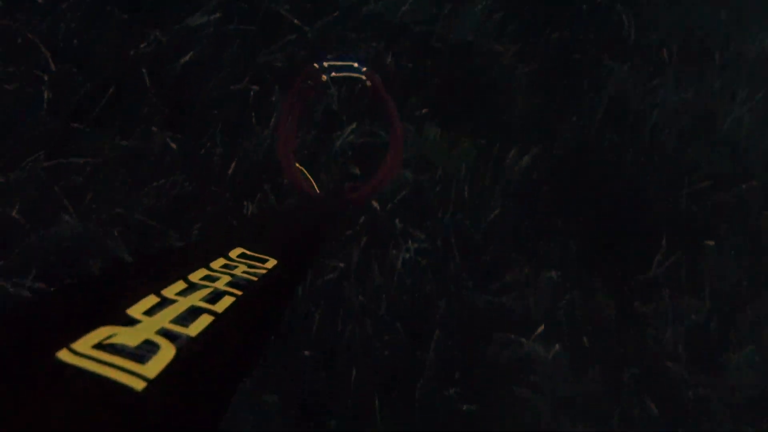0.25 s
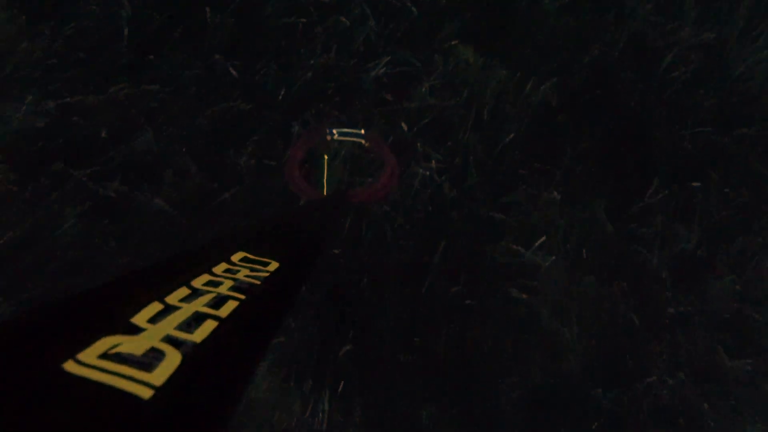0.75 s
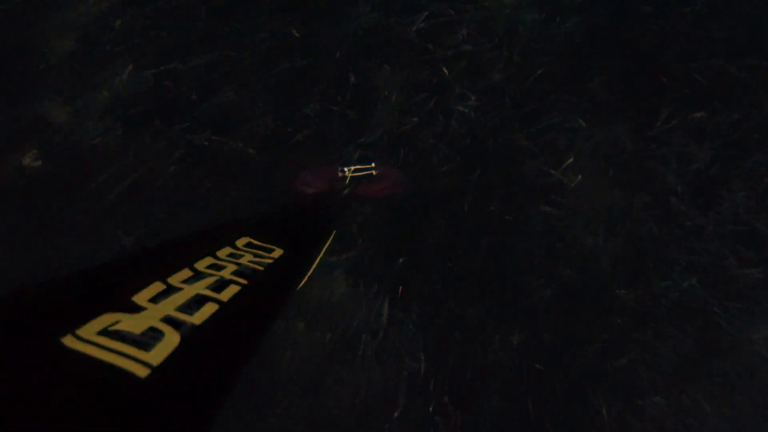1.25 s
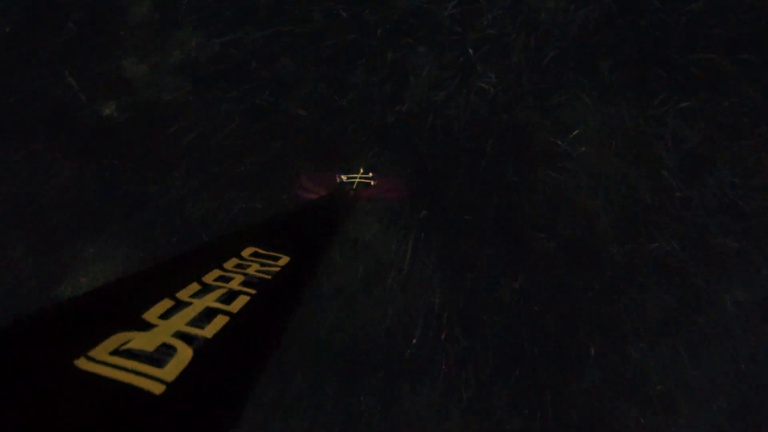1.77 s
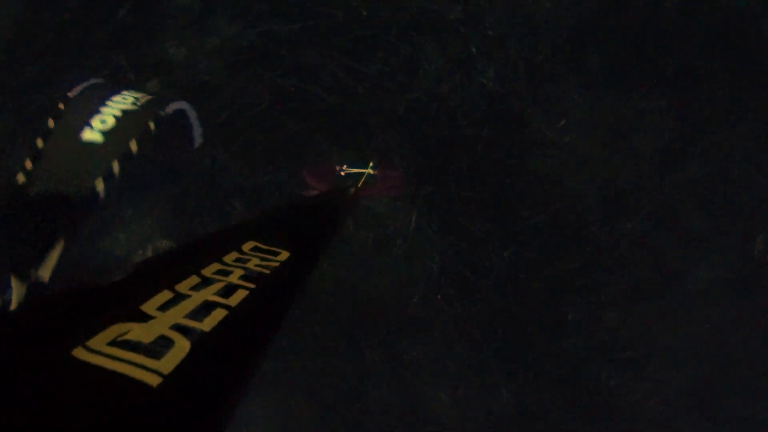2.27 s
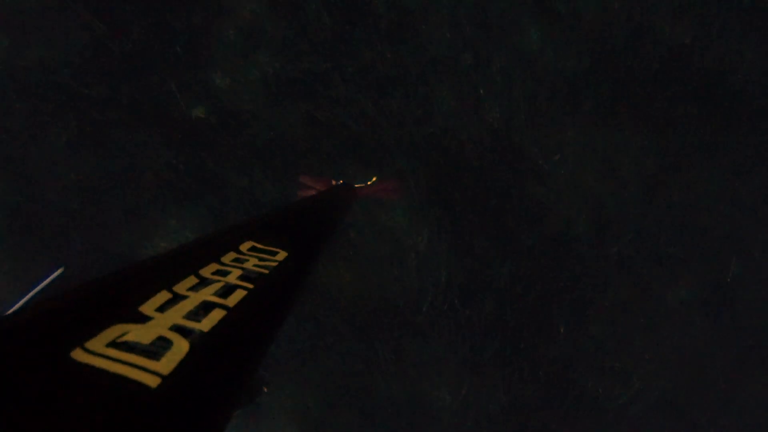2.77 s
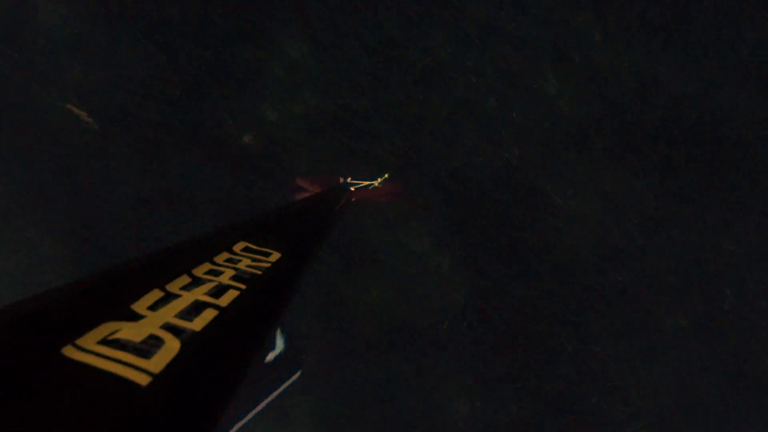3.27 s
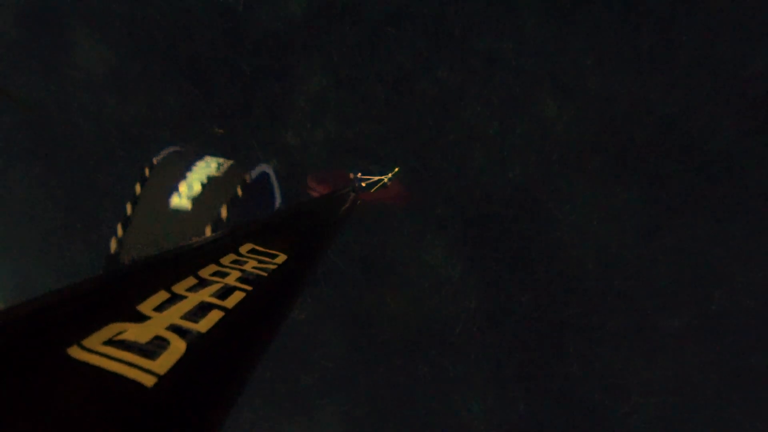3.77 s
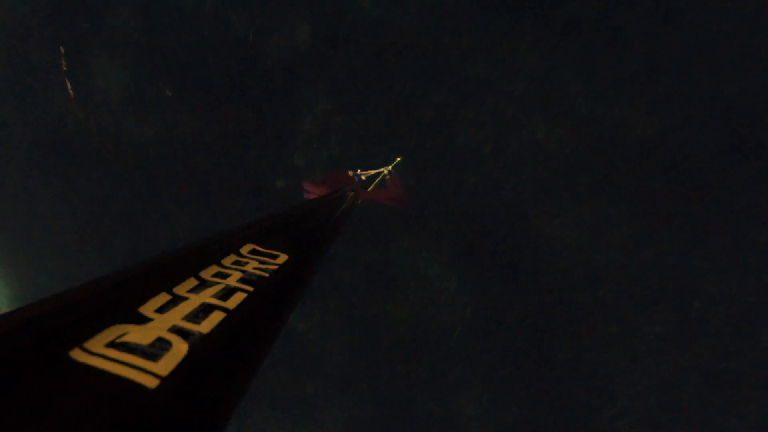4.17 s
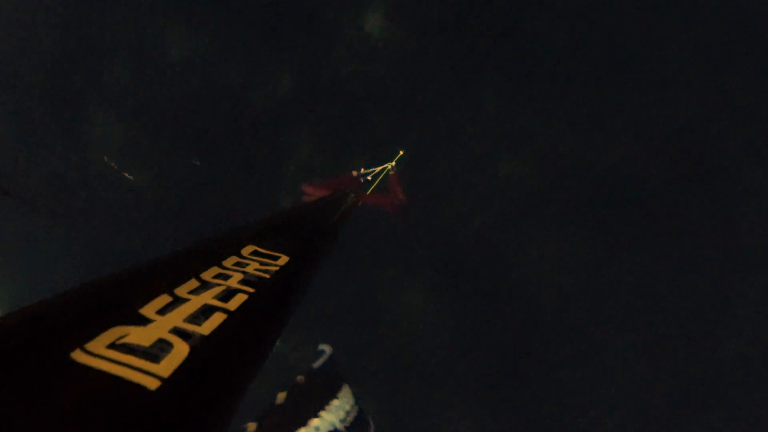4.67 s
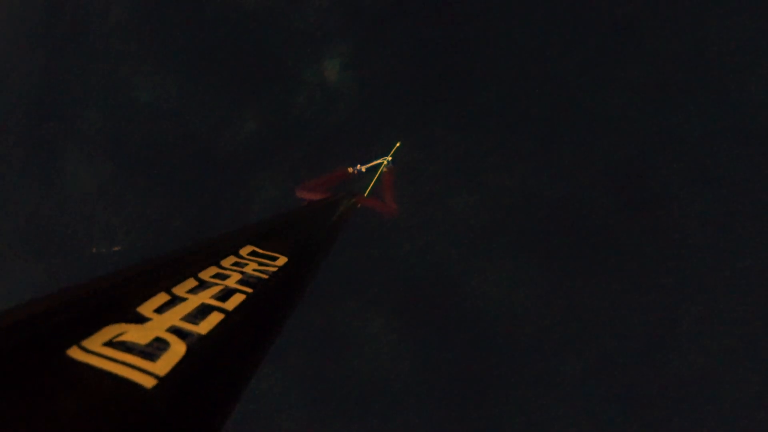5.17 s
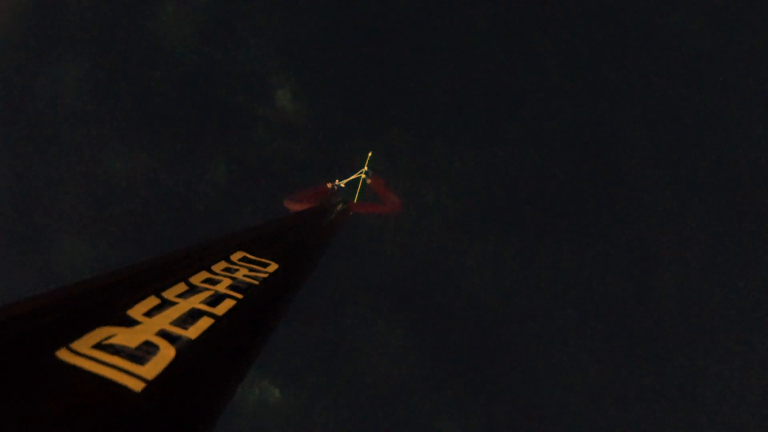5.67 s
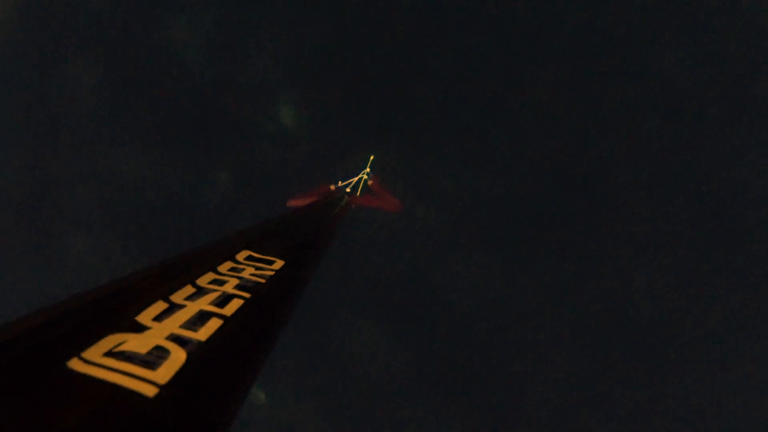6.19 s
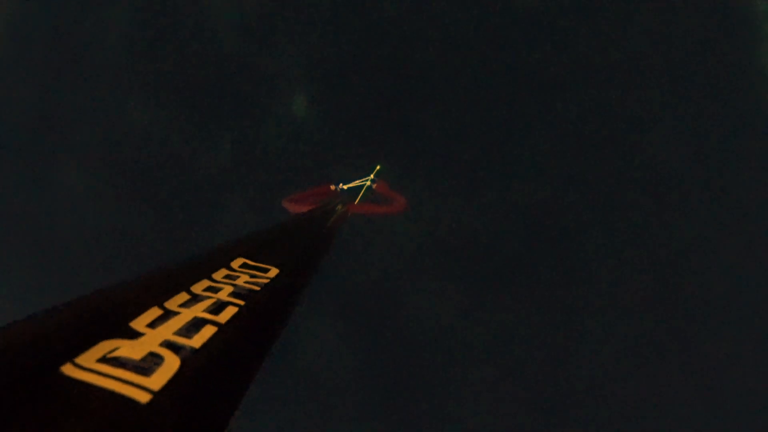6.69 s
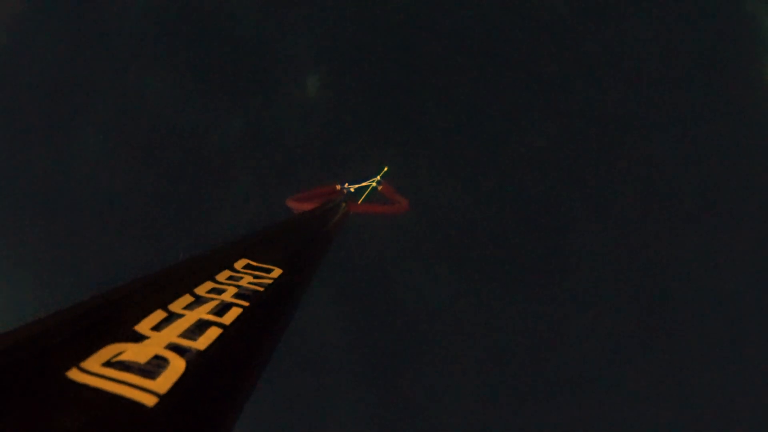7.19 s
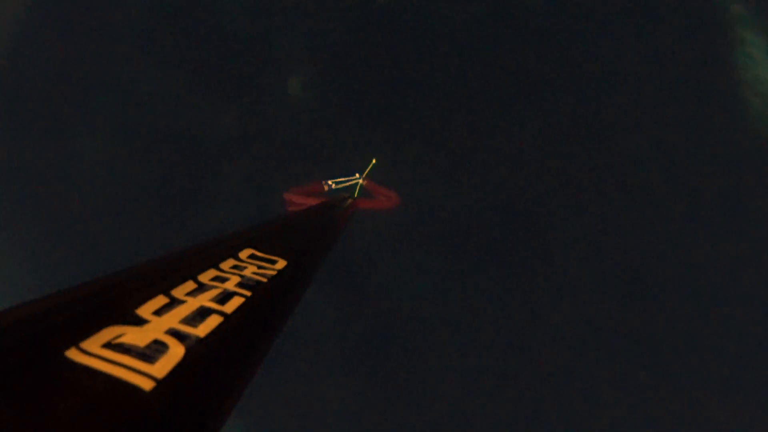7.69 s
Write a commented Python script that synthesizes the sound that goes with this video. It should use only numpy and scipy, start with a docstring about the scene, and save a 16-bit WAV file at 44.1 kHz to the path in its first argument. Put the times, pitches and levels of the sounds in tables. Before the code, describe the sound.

Close underwater sound picked up through a pole and a sealed camera case. Weed stems tick and crackle lightly over faint hiss, with short hollow ringing taps and a bubble plip. Around the middle the knocks grow heavier and more frequent and a low hum rises. Then shoves against the bottom bring bumps, gritty scrapes, short groans and squeaky brushes, busiest near the end.

```python
"""Camera on a pole pushed through weed under water

A camera in a sealed case rides on a pole that is pushed through weed and over the bottom.
Its stereo microphones hear stems and grit up close, as struck and rubbed resonances of pole, mount and case.
Banks of fading sines make the rings and bubble plips; repeated pushes make slips; wavering sines make the hum.
Later shoves bring bumps, groans and a swelling hum, over filtered noise for buffeting and hiss.
"""
import sys
import numpy as np
from scipy import signal
from scipy.fft import rfft, irfft
from scipy.io import wavfile
from scipy.ndimage import uniform_filter1d, map_coordinates

SR = 44100
rng = np.random.default_rng(int(sys.argv[2]) if len(sys.argv) > 2 else 0)


def dump(signal):
    """Clip the signal to [-1, 1] and save it as 16-bit WAV at the path in sys.argv[1]."""
    limited = np.clip(np.atleast_2d(signal).T, -1, 1)
    pcm = np.round(limited * 32767).astype(np.int16)
    wavfile.write(sys.argv[1], SR, pcm)


N = 350154
TIME = np.arange(N) / SR

# All mode tables list nominal resonances, before each blow's scatter and detuning:
# pitch_hz, width_hz, level_db (relative), left_minus_right_db, right_lead_rad
# ringing of the pole
POLE_MODES = [(99, 14, -6, -6, 0.27), (134.9, 14, 4, -6, 0.97), (180, 200, -8, -5.5, 0.97)]
# ringing of the mount between pole and case, same columns
MOUNT_MODES = [(361, 250, -8, 3.5, 0.1), (437.9, 24.5, 5.5, 1.1, 0.5), (534.4, 33, -3.5, -4, -0.5)]
# upper ringing of the mount, same columns
PING_MODES = [(676.7, 100, -2.5, 7, -1.3), (750.6, 33, 0.3, -7.5, -0.72)]
# ringing of the thin case, same columns
CASE_MODES = [(935, 110, 1, 13, -0.65), (1094, 290, 2.5, -6, 1.74), (1245, 116, 5.5, -5.5, 0.44),
              (1876, 93, -8, 1, -1.9), (2207, 230, -16.5, -2.5, -2.5)]
# sharp snaps near the case, same columns
SNAP_MODES = [(1940, 610, 1.5, 0, -2), (3150, 600, -5.5, -1, 1), (6200, 1600, -11, -1, 0)]
# how hard the pole is pushed along: time_s, effort_db
EFFORT = [(0, -56.5), (.7, -49.5), (3.1, -53), (3.9, -40.5), (4.1, -36.5), (5.35, -35), (5.6, -41.5),
          (6, -43), (7.2, -47), (7.94, -44)]
# how thickly the weed brushes the pole: time_s, level_db
WEED = [(0, -47), (.25, -56), (.45, -46), (1.1, -54.5), (1.3, -60), (3, -66), (4.5, -55.5), (5.3, -52),
        (6, -59), (6.48, -43.5), (6.6, -53.5), (7.94, -64)]
# shoves against the bottom: start_s, length_s, rumble_db, grating_db, deep_hum_db (before mixing gains)
SHOVES = [(4.684, 0.014, -32.5, -25.5, -57), (5.252, 0.037, -27, -26.5, -34.5),
          (5.371, 0.086, -29.5, -29.5, -31.5), (6.281, 0.08, -32.5, -43, -67),
          (6.467, 0.024, -21, -26.5, -38.5), (6.663, 0.059, -28.5, -32.5, -31),
          (6.87, 0.028, -26.5, -33.5, -31), (7.037, 0.026, -25.5, -31.5, -47.5),
          (7.279, 0.032, -34.5, -37, -50.5), (7.385, 0.18, -20.5, -23, -24),
          (7.578, 0.079, -21.5, -22.5, -26.5), (7.694, 0.035, -22.5, -25.5, -35.5)]


def undb(db):
    """Decibels to gain."""
    return 10 ** (np.asarray(db) / 20)


def unit(x):
    """Scale to rms 1."""
    return x / np.sqrt(np.mean(x ** 2))


def curve(table, at=TIME):
    """The columns of a table, joined by straight lines in time."""
    times, *columns = np.transpose(table)
    return np.squeeze([np.interp(at, times, column) for column in columns])


def add(out, s, sound):
    """Mix a stereo sound in at time s."""
    start = max(int(s * SR), 0)
    out[:, start:start + sound.shape[1]] += sound[:, :N - start]


def walk(rate):
    """Random levels held 1 / rate s and smoothed twice; spread near 1."""
    hold = int(SR / rate)
    steps = np.repeat(rng.standard_normal(N // hold + 1), hold)
    smooth = uniform_filter1d(uniform_filter1d(steps, hold), hold)
    return 1.3 * smooth[:N]


def noise(spectrum, common):
    """Coloured stereo noise with a part common to both ears; rms 1."""
    hz, db = np.transpose(spectrum)
    bins_hz = np.arange(N // 2 + 1) * SR / N
    colour = undb(np.interp(np.log(bins_hz + 1), np.log(hz), db))
    white = rng.standard_normal((2, N)) + common * rng.standard_normal(N)
    return unit(irfft(rfft(white) * colour, N))


def bend(x, speed):
    """Multiply the pitch of a stereo sound by a changing factor."""
    position = np.cumsum(speed)
    return np.array([map_coordinates(ear, [position], order=1, mode="mirror") for ear in x])


def sag(sound, share):
    """A struck resonance starts sharp by this share and sinks to its own pitch as the load comes off."""
    settle_s = 0.012
    t = np.arange(sound.shape[1]) / SR
    return bend(sound, 1 + share * np.exp(-t / settle_s))


def flex(x, depth, rate):
    """The pole flexes under its load, which bends the pitch of its ringing up and down."""
    return bend(x, 1 + depth * walk(rate))


def ring(modes, size, scatter_db, detune, pitch=1, contact_s=0, tilt_db=0):
    """Stereo ring after one blow, peak 1; each point of contact weights the modes differently."""
    hz, width, db, pan_db, lead = np.transpose(modes)
    t = np.arange(size) / SR
    chance = rng.standard_normal((2, len(hz)))
    hz = hz * pitch * (1 + detune * chance[0])
    weight = width * undb(db + scatter_db * chance[1] + tilt_db * np.log2(hz))
    # neighbouring modes start in opposite directions, so the ring takes a moment to swell
    weight = weight * (-1.) ** np.arange(len(hz))
    # the two microphone ports feel each mode with their own strength and phase
    ports = undb(np.outer([.5, -.5], pan_db)) * np.exp(1j * np.outer([-.5, .5], lead))
    fading_sines = np.exp(np.outer(2j * np.pi * hz - np.pi * width, t))
    y = ((ports * weight) @ fading_sines).imag
    # the ring builds up smoothly while the contact lasts
    y *= np.sin(np.pi / 2 * np.minimum(t / max(contact_s, 1 / SR), 1)) ** 2
    return y / np.abs(y.mean(axis=0)).max()


def repeat(sound, lags, pushes):
    """The same ring set off again and again; peak 1."""
    out = np.zeros_like(sound)
    for lag, push in zip(lags, pushes):
        out[:, lag:] += push * sound[:, :max(sound.shape[1] - lag, 0)]
    return out / np.abs(out.mean(axis=0)).max()


def chatter(sound, slip_s, gap_s, fall_db, count):
    """A contact catches and slips in uneven grains that swell, hold for slip_s and fall away; peak 1."""
    gaps, sizes = .5 + rng.random((2, count))
    at = gap_s * (np.cumsum(gaps) - gaps[0])
    swell = np.minimum((at + gap_s) / (slip_s / 2 + gap_s), 1)
    fall = undb(-fall_db * np.maximum(at - slip_s, 0) / gap_s)
    pushes = sizes * swell * fall
    pushes[0] = 1 + rng.random() / 2  # the first strike is crisp
    return repeat(sound, (at * SR).astype(int), pushes)


def slipping(sound, hz, slip_s, jitter, count):
    """A stem strikes, then slips once a cycle for slip_s, so the ring holds and bends in pitch; peak 1."""
    chance = rng.standard_normal((2, count))
    drift = rng.standard_normal() * np.linspace(-1, 1, count)
    periods = SR / hz * (1 + jitter * (chance[0] + drift))
    lags = (np.cumsum(periods) - periods[0]).astype(int)
    along = np.minimum((np.arange(count) + .5) / (slip_s * hz + 1), 1)
    pushes = np.cbrt(np.abs(np.sin(np.pi * along))) * undb(chance[1])
    pushes[0] *= 2  # extra weight on the first strike
    return repeat(sound, lags, pushes)


def rub(modes, per_s, spread_db, contact_s, size, count=3):
    """Dense little slips of uneven strength at a few points of contact ring the modes; rms 1."""
    out = 0
    for _ in range(count):
        happens = rng.random(N) < per_s / count / SR
        direction = rng.choice([-1, 1], N)
        strength = undb(spread_db * np.minimum(rng.exponential(size=N), 4))
        slips = happens * direction * strength
        response = ring(modes, size, scatter_db=1, detune=.005, contact_s=contact_s)
        out = out + signal.oaconvolve(slips[None], response, axes=1)[:, :N]
    return unit(out)


def even(x, span_s):
    """Hold the strength steady over spans longer than span_s."""
    power = uniform_filter1d(np.mean(x ** 2, axis=0), int(span_s * SR))
    power = uniform_filter1d(power, int(span_s * SR / 2))
    return x / np.sqrt(power + 1e-4)


def notes(rows, wander, flutter_db, rate):
    """Lasting tones whose pitch and strength waver with the flow."""
    ears = np.array([[.5], [-.5]])
    out = 0
    for hz, db, pan_db, lead in rows:
        phase = 2 * np.pi * np.cumsum(hz * (1 + wander * walk(rate))) / SR
        gain = undb(db + ears * pan_db + flutter_db * walk(rate))
        out = out + np.sqrt(2) * gain * np.sin(phase - ears * lead)
    return out


def blows(events, modes, gain_db, contact_s, detune, size, glide=0):
    """A table of events that all ring the same modes."""
    out = np.zeros((2, N))
    for s, db in events:
        blow = ring(modes, size, 7.5, detune, contact_s=contact_s)
        add(out, s, undb(db + gain_db) * sag(blow, glide))
    return out


def shoves(attack_s, release_s):
    """Strength of rumble, grating and deep hum: each shove rises, holds and lets go."""
    out = 0
    for s, length, *db in SHOVES:
        rise = np.clip((TIME - s) / attack_s, 0, 1)
        release = np.exp(-np.maximum(TIME - s - length, 0) / release_s)
        out = out + np.outer(undb(db), rise * release)
    return out


def microphone_hiss():
    """Steady microphone noise, partly shared by the two ears."""
    # colour of the noise: pitch_hz, density_db (relative, per Hz)
    hiss_colour = [(20, 16), (60, 15), (300, 14), (2500, 3), (5000, -1.5), (8000, -3), (11000, -5.5)]
    return undb(-65) * noise(hiss_colour, common=0.49)


def hum():
    """The flow buffets the case and keeps the pole humming at its bending notes; shoves make it swell."""
    # lasting deep note of the pole: pitch_hz, level_db (relative), left_minus_right_db, right_lead_rad
    deep_notes = [(53.45, -1, -6, 0.0013)]
    # lasting upper note of the pole, same columns
    upper_notes = [(201, -6, 1.3, 1)]
    # water buffeting the case: pitch_hz, density_db (relative, per Hz)
    buffet_colour = [(12, -28.5), (42, -10), (80, -2.5), (140, -22), (600, -81)]
    # water streaming past the pole: time_s, level_db (before the parts' gains)
    flow = [(0, -53), (.7, -67.5), (3.95, -54), (4.35, -41), (4.85, -50.5), (5.7, -36), (6.3, -47),
            (6.8, -33.5), (7.2, -58.5), (7.94, -63.5)]
    deep = notes(deep_notes, wander=.07, flutter_db=3, rate=14)
    upper = notes(upper_notes, wander=.035, flutter_db=5.5, rate=24)
    buffet = noise(buffet_colour, common=5)
    # the bending notes build up and die away slowly
    *_, swell = shoves(attack_s=0.072, release_s=0.096)
    low_gain = np.hypot(undb(curve(flow)), swell)
    upper_gain = np.hypot(undb(curve(EFFORT)), undb(-4.5) * swell)
    low = undb(-3.5) * deep + undb(-5.0) * buffet
    return low * low_gain + upper * upper_gain


def drag():
    """Weed and silt slide along the pole: a rumble in the shaft, a drone in the mount, a crackle in the case."""
    hold_s = .1
    pole = even(rub(POLE_MODES, per_s=300, spread_db=1.0, contact_s=0.0015, size=9000), hold_s)
    mount = even(rub(MOUNT_MODES, per_s=200, spread_db=2.5, contact_s=0.0014, size=5000), hold_s)
    upper = even(rub(PING_MODES, per_s=130, spread_db=2.0, contact_s=0.00062, size=5000), hold_s)
    case = even(rub(CASE_MODES, per_s=490, spread_db=4.0, contact_s=0.0012, size=1800), hold_s)
    pole, mount, upper, case = (flex(part, depth=.028, rate=22) for part in (pole, mount, upper, case))
    effort, weed = undb(curve(EFFORT)), undb(curve(WEED))
    rumble, grating, _ = shoves(attack_s=0.01, release_s=0.042)
    # effort shakes the shaft, weed rustles the case, the mount between them feels both
    pole_gain = np.hypot(effort, rumble)
    mount_gain = np.linalg.norm([effort, undb(4.0) * weed, grating], axis=0)
    upper_gain = np.linalg.norm([undb(-11.5) * effort, weed, undb(-10.0) * grating], axis=0)
    case_gain = np.hypot(weed, undb(-17.5) * grating)
    # stems catch and let go, so the crackle comes in short rounded bursts
    catch_db = 6.5 * np.tanh(1.5 * walk(75)) - 1.5
    drone = mount * mount_gain + upper * upper_gain
    crackle = case * case_gain * undb(catch_db)
    return pole * pole_gain + drone + crackle


def tap(s, mount_db, case_db, slip_s=0):
    """One tap chatters on the case, sings in the mount and nudges the pole; grit adds a tick and a snap."""
    # how the taps' colour changes: grit tick strongest at the start, case brightest near 4 s, duller later:
    # time_s, case_brightness_db_per_octave, grit_tick_db (relative to the mount), mount_pitch_hz
    contact = [(0, 1.5, -37, 472), (1.6, 1.5, -43, 448.5), (2.4, 0, -54, 439.6), (4, 2.5, -40, 443.7),
               (5.9, -11, -47.5, 408.6), (6.5, -5.5, -43.5, 484)]
    # thin tick of grit: pitch_hz, width_hz, level_db (relative), left_minus_right_db, right_lead_rad
    grit_modes = [(2830, 65, -0.91, -2, 0.89)]
    # ringing of the nudged pole, same columns
    nudge_modes = [(98, 5.1, -8.5, -4.5, .4), (205.5, 8.6, -0.5, 0.5, 0.93)]
    tilt_db, grit_db, hz = curve(contact, s)
    pitch = hz / 440  # relative to the mount's nominal 440 Hz
    case = ring(CASE_MODES, size=3000, scatter_db=3.5, detune=.025, contact_s=0.001, tilt_db=tilt_db)
    mount = ring(MOUNT_MODES, size=5000, scatter_db=6.5, detune=0.03, pitch=pitch, contact_s=0.0017)
    upper = ring(PING_MODES, size=5000, scatter_db=4.0, detune=0.0093, contact_s=0.0033)
    grit = ring(grit_modes, size=5000, scatter_db=-2, detune=0.028, contact_s=0.00069)
    pole = ring(nudge_modes, size=5000, scatter_db=10.5, detune=0.047, contact_s=0.0045)
    snap = ring(SNAP_MODES, size=600, scatter_db=5.5, detune=.06, contact_s=0.00022, tilt_db=8)
    mount = slipping(mount, hz, slip_s, jitter=.04, count=16)
    case = chatter(case, slip_s, gap_s=.0045, fall_db=11, count=10)
    upper = chatter(upper, slip_s, gap_s=.0045, fall_db=11, count=10)
    out = undb(mount_db) * (mount + undb(-13.0) * upper + undb(grit_db) * grit + undb(-17) * pole)
    add(out, 0, undb(case_db) * case)
    add(out, 0, undb(case_db - 26.0) * snap)
    return sag(out, .05 * rng.random())


def light_taps(count):
    """Thin stems tick against the pole at random, louder where the weed is thick."""
    out = np.zeros((2, N))
    mount_db, case_db, range_db = 12, 10, 5.6  # the first two relative to the weed
    for k, (when, strength) in enumerate(rng.random((count, 2))):
        s = (k + when) / count * N / SR  # one tap in each equal stretch of time
        db = curve(WEED, s) + range_db * strength
        add(out, s, tap(s, db + mount_db, db + case_db))
    return out


def taps():
    """Stems and stones strike the pole; some keep slipping along it for a moment."""
    # taps on the pole: start_s, mount_peak_db, case_peak_db, slip_s (0 for a clean tap)
    tap_events = [(0.081, -30, -35, 0.017), (.133, -33, -36, 0.01), (.304, -27, -33, 0.024),
                  (0.39, -38, -45, 0.0088), (0.419, -30.5, -32.5, 0.015), (0.559, -22, -33, 0.014),
                  (0.632, -27.5, -29.5, 0.01), (0.669, -28, -30, 0), (.906, -28, -39, 0.004),
                  (.975, -35, -34, 0.0052), (1.017, -26, -29.5, 0), (1.082, -27.5, -31.5, 0.016),
                  (1.133, -17, -24, 0.013), (1.246, -34, -38, 0.024), (1.345, -31, -57, 0.00012),
                  (1.538, -16.5, -23.5, 0.0036), (1.553, -22, -22.5, 0.0039), (1.578, -20.5, -31.5, 0.003),
                  (1.599, -21.5, -30, 0.008), (1.628, -21.5, -29, 0.0089), (1.725, -26.5, -33, 0.013),
                  (1.781, -29.5, -29, 0.0099), (1.969, -23.5, -29, 0.0085), (2.012, -28.5, -36.5, 0),
                  (2.047, -23.5, -40, 0.00014), (2.079, -32.5, -41, 0.0046), (2.227, -24, -26, 0.0035),
                  (2.491, -30, -30.5, 0.0069), (2.523, -26, -42, 0.0023), (2.588, -30, -42.5, .004),
                  (2.611, -28, -47, 0.0058), (2.74, -35, -30.5, 0.01), (2.805, -32.5, -44, 0),
                  (2.889, -31.5, -36.5, 0), (3.11, -34, -37, 0.016), (3.2, -34, -32.5, 0.012),
                  (3.435, -25, -44.5, 0.0038), (3.46, -18, -42, 0.0043), (3.681, -24, -35, 0.00046),
                  (3.75, -20, -39, 0.0052), (3.973, -11.5, -31.5, 0.0036), (4.023, -13.5, -34, 0.007),
                  (4.042, -16, -37.5, 0.0077), (4.144, -16, -30.5, 0.0023), (4.16, -23, -25, 0.0014),
                  (4.245, -19.5, -39.5, 0.018), (4.284, -19, -36, 0), (4.42, -15, -24.5, 0.003),
                  (4.495, -21, -41.5, 0.0026), (4.538, -16.5, -33.5, 0.0045), (4.595, -21.5, -38, 0),
                  (4.637, -14, -34.5, 0.019), (4.683, -17.5, -24.5, 0.012), (4.769, -13.5, -33, 0.0089),
                  (4.79, -10, -33, 0.013), (4.932, -13, -35.5, 0.013), (4.958, -11.5, -24.5, .003),
                  (5.023, -17.5, -27, 0.0042), (5.159, -24.5, -28, 0.0029), (5.244, -14.5, -26.5, 0.025),
                  (5.372, -16.5, -24, 0.00048), (5.413, -29, -54, 0.01), (5.466, -16.5, -38.5, 0.0058),
                  (5.739, -24.5, -47, 0.0031), (5.908, -18.5, -58, 0.0029), (6.409, -20, -26, 0.0048),
                  (6.468, -21, -22, 0.02), (6.516, -29.5, -26.5, 0.021), (6.589, -41, -36, 0.00027),
                  (6.664, -28, -24.5, 0.003), (6.882, -26, -30, 0.0023), (6.917, -18, -26, 0.0025),
                  (7.076, -21.5, -40.5, 0.0061), (7.278, -12, -27, 0.0028), (7.376, -30, -24.5, 0.0012),
                  (7.44, -17.5, -23, 0.0046), (7.474, -17, -34, 0.0018), (7.516, -29, -19, 0),
                  (7.581, -11, -23, 0.0095), (7.622, -18, -22.5, 0), (7.696, -12.5, -30, 0.0019),
                  (7.752, -36, -30, .002)]
    out = np.zeros((2, N))
    for row in tap_events:
        add(out, row[0], tap(*row))
    return out


def swishes():
    """Fronds brush the case: they slip ever faster, a rough rising squeak in its ring, with a fine rasp."""
    # fronds passing the case: middle_s, length_s, squeak_db, rasp_db
    swish_events = [(0.466, 0.12, -48, -71.5), (4.787, 0.072, -54, -64), (5.877, 0.053, -41.5, -68),
                    (6.169, 0.071, -35, -60.5), (6.498, 0.1, -47.5, -70), (7.466, 0.16, -46, -63),
                    (7.574, 0.065, -38.5, -55), (7.712, 0.035, -37.5, -61.5)]
    # case under the squeak: pitch_hz, width_hz, level_db (relative), left_minus_right_db, right_lead_rad
    swish_modes = [(1200, 220, 7, -2, 1.2), (2000, 220, 9.9, 1.2, -1.5)]
    # fine rasp, same columns
    rasp_modes = [(2820, 810, 5.5, -0.78, 1), (4000, 1300, -6.5, 0, -1.1), (6800, 2000, -13.5, -1, 0)]
    middle_hz, rise_hz = 1655, 645  # slip rate at the middle of a swish, and its rise from start to end
    rasp = rub(rasp_modes, per_s=1100, spread_db=3.5, contact_s=0.000077, size=900)
    body = ring(swish_modes, size=900, scatter_db=3.5, detune=0)
    body = 2 * body / np.abs(rfft(body)).max()
    waver = 1 + .19 * walk(2200)
    slips, rasp_gain = 0, 0
    for s, length, squeak_db, rasp_db in swish_events:
        along = (TIME - s) / length
        swell = np.exp(-np.abs(2 * along) ** 3)
        hz = middle_hz + rise_hz * np.clip(along, -1, 1)
        phase = 2 * np.pi * np.cumsum(hz * waver) / SR
        slips = slips + undb(squeak_db) * swell * np.sin(phase)
        rasp_gain = rasp_gain + undb(rasp_db) * swell
    squeak = signal.oaconvolve(slips[None], body, axes=1)[:, :N]
    return squeak + rasp * rasp_gain


def snaps():
    """Sharp snaps of grit or tiny bubbles near the case: very short, broad rings."""
    # snaps near the case: start_s, level_db (before the gain below)
    snap_events = [(2.1276, -46), (2.314, -46.5), (2.3418, -36.5), (2.7225, -53), (3.3447, -44.5),
                   (3.6144, -47), (4.315, -44.5), (7.6, -40), (7.7183, -46)]
    return blows(snap_events, SNAP_MODES, gain_db=5.0, contact_s=0.0012, detune=0.082, size=600)


def plips():
    """Hollow bubble plips close to the microphones, as short rings."""
    # bubble plips: start_s, peak_db
    plip_events = [(2.3415, -13), (7.629, -22)]
    # ring of a plip: pitch_hz, width_hz, level_db (relative), left_minus_right_db, right_lead_rad
    plip_modes = [(135, 200, 9, -7, 1.4), (434, 36, -2, -8, 2.4), (760, 190, 14, 1, -2.2)]
    return blows(plip_events, plip_modes, gain_db=0, contact_s=0.0028, detune=0.016, size=2000)


def bumps():
    """Every shove begins with a bump that rings the pole, as strong as its rumble calls for."""
    events = [(s, rumble_db) for s, _, rumble_db, *_ in SHOVES]
    return blows(events, POLE_MODES, gain_db=2, contact_s=0.014, detune=0.013, size=9000)


def groans():
    """The pole's tip skids, sticking and slipping on one resonance: rough tones swell, glide and fade."""
    # groans of the pole: start_s, length_s, start_hz, end_hz, level_db
    groan_events = [(5.274, 0.052, 805, 760, -32.5), (5.379, 0.053, 775, 707, -34.5),
                    (5.464, 0.04, 830, 703, -25.5), (6.448, 0.1, 435, 492, -26),
                    (6.659, 0.05, 110, 137, -20.5), (6.685, 0.068, 400, 465, -28),
                    (6.866, 0.045, 126, 130, -22.5), (6.965, 0.075, 421, 374, -33),
                    (6.968, 0.13, 116, 141.5, -23)]
    waver, flutter = 1 + 0.059 * walk(120), undb(2 * walk(120))
    ears = np.array([[.5], [-.5]])
    pan_db, lead = -4, .6  # left minus right in dB, right ear's lead in rad
    out = 0
    for s, length, start_hz, end_hz, db in groan_events:
        along = np.clip((TIME - s) / length, 0, 1)
        hz = start_hz + (end_hz - start_hz) * along
        phase = 2 * np.pi * np.cumsum(hz * waver) / SR
        swell = np.sin(np.pi * along)
        out = out + np.sqrt(2) * undb(db) * swell * np.sin(phase - ears * lead)
    return out * flutter * undb(ears * pan_db)


def pings():
    """Glancing blows ring the upper notes of the mount, which start sharp and sink."""
    # glancing blows: start_s, level_db (before the gain below)
    ping_events = [(5.468, -20.5), (7.283, -19.5), (7.587, -19.5)]
    return blows(ping_events, PING_MODES, gain_db=-3.0, contact_s=0.00063, detune=0.0094, size=5000, glide=.16)


def scene():
    """Everything the camera hears through pole, case and water, over its own hiss."""
    steady = microphone_hiss() + hum() + drag()
    contacts = light_taps(count=64) + taps() + swishes()
    nearby = snaps() + plips()
    pushing = bumps() + groans() + pings()
    return steady + contacts + nearby + pushing


def record(dry):
    """The camera drops the deepest rumble and cuts the top."""
    low_hz, top_hz = 14, 11250
    high_pass = signal.butter(2, low_hz, "high", fs=SR, output="sos")
    thinned = signal.sosfilt(high_pass, dry)
    low_pass = signal.ellip(10, .2, 70, top_hz, fs=SR, output="sos")  # 0.2 dB ripple, 70 dB down
    return signal.sosfilt(low_pass, thinned)


dry = scene()
out = record(dry)
dump(out)
```